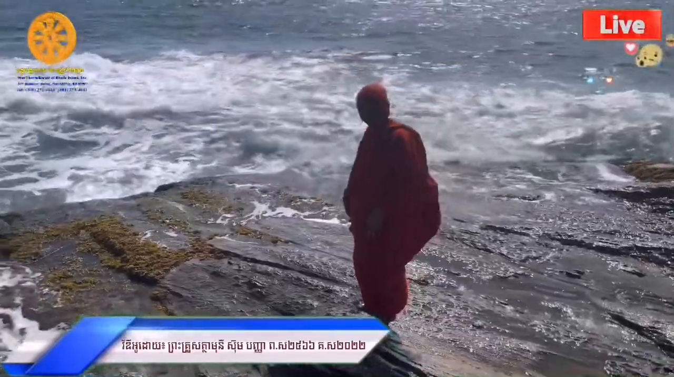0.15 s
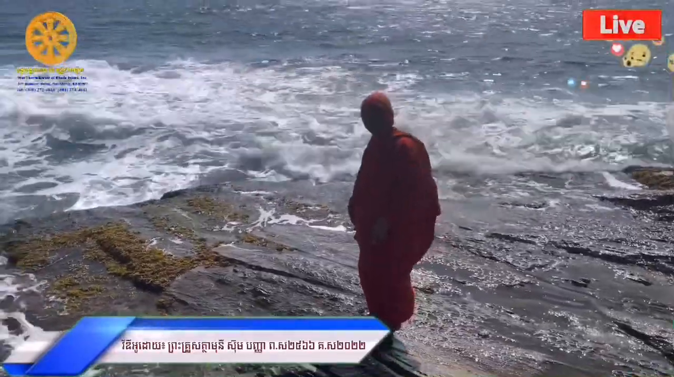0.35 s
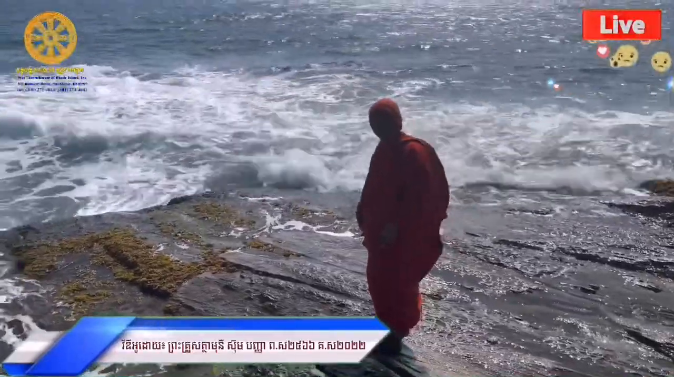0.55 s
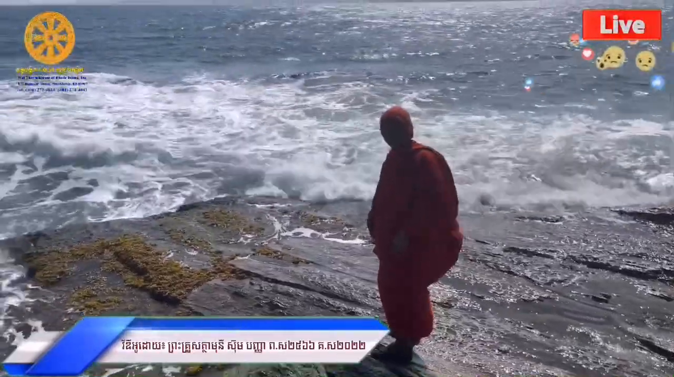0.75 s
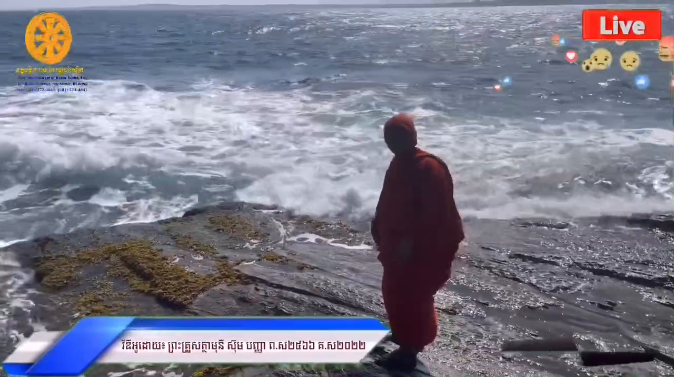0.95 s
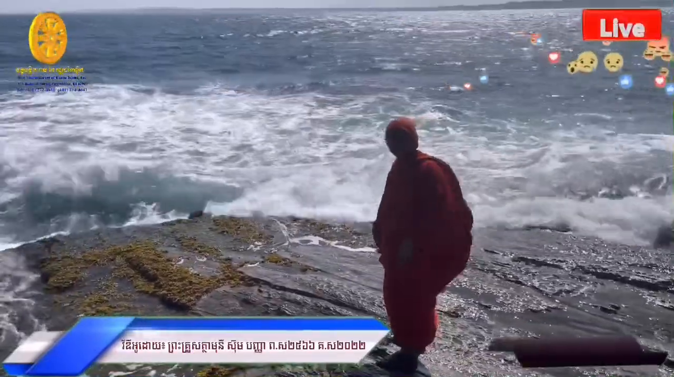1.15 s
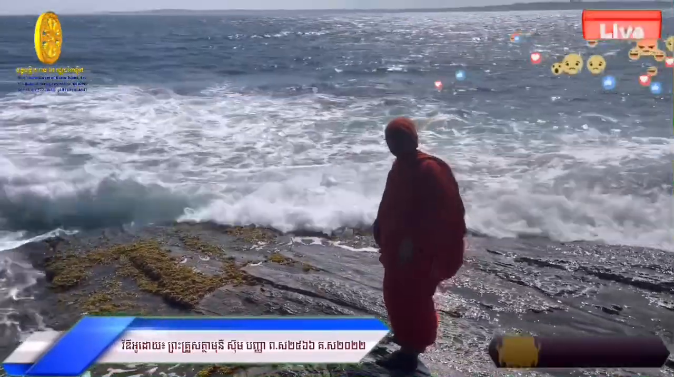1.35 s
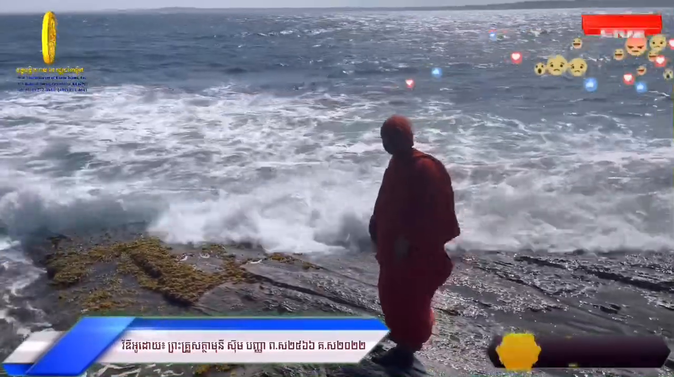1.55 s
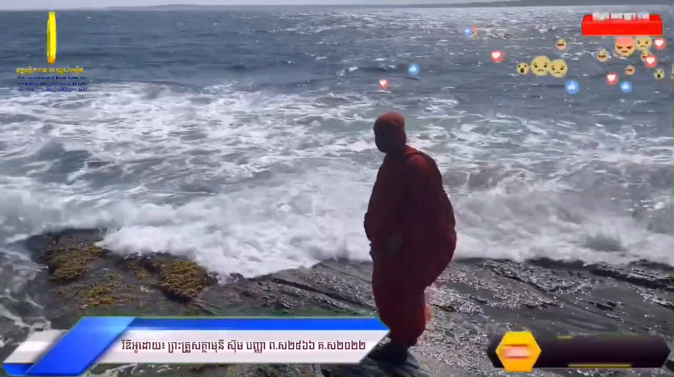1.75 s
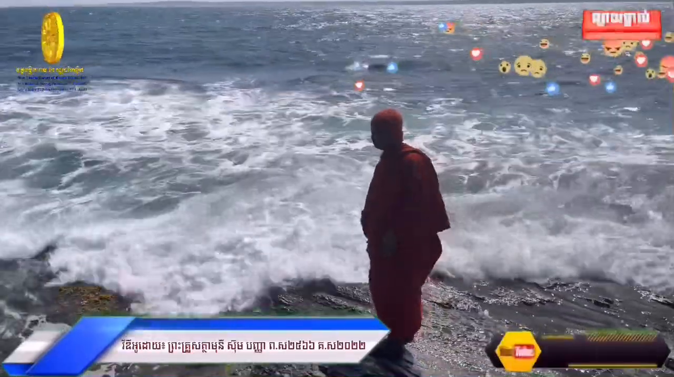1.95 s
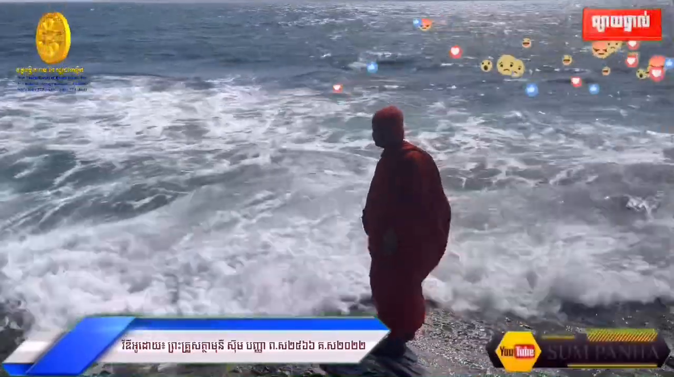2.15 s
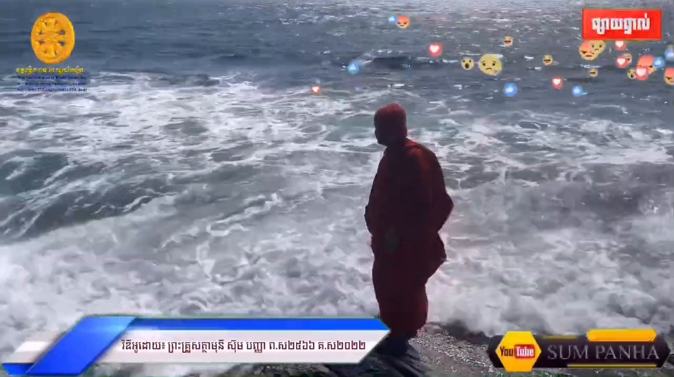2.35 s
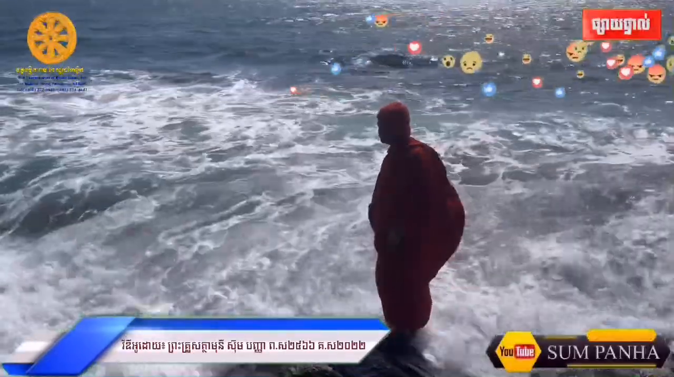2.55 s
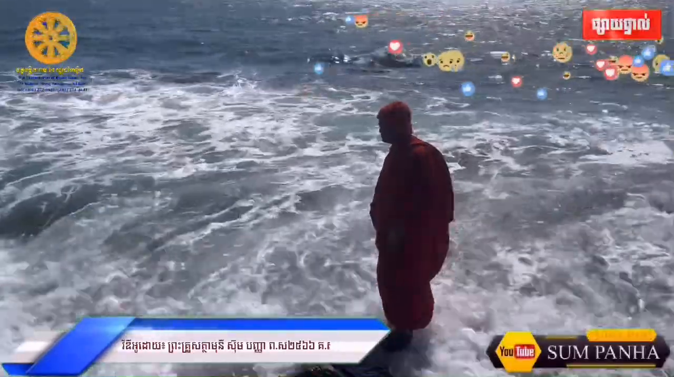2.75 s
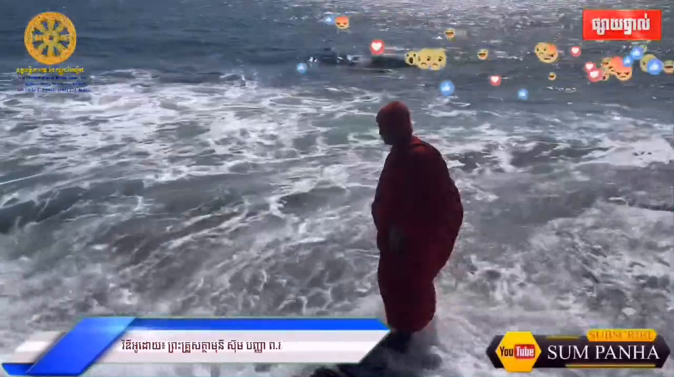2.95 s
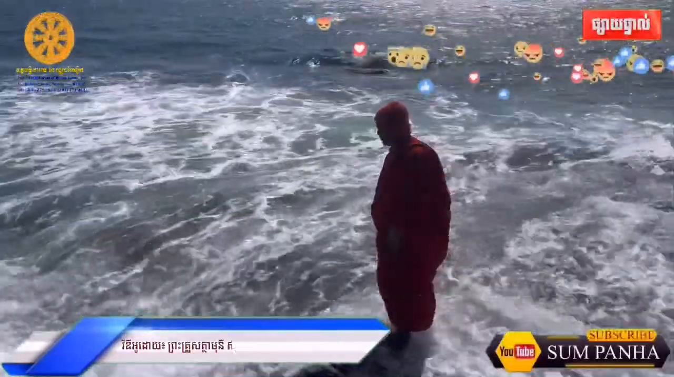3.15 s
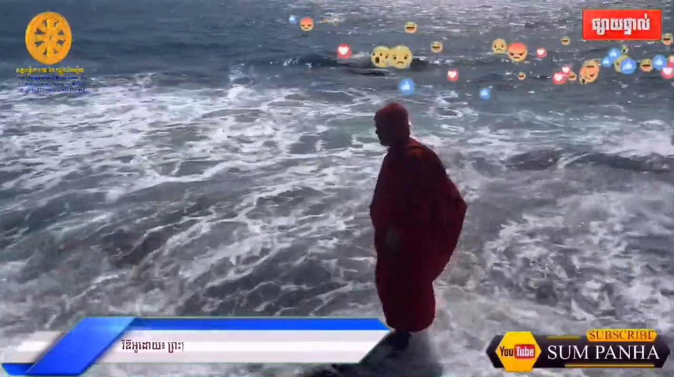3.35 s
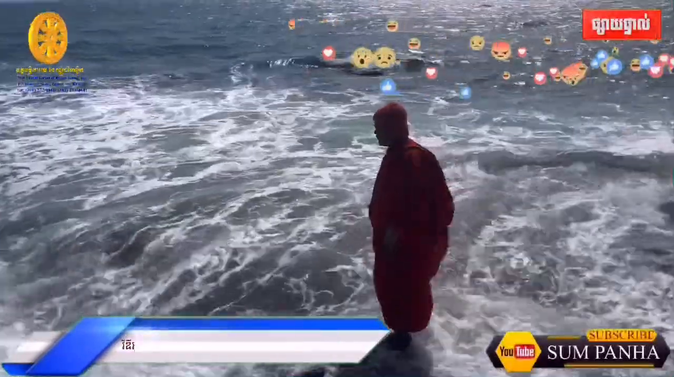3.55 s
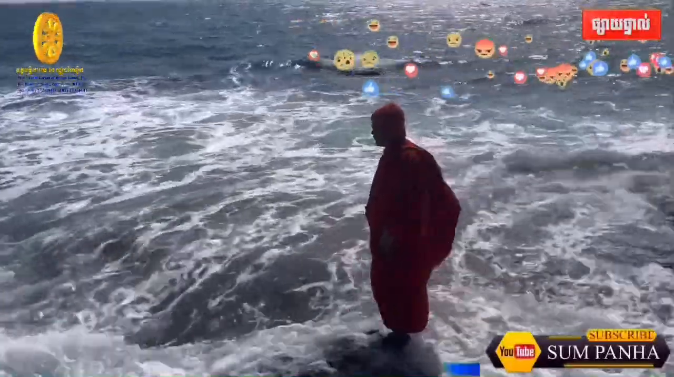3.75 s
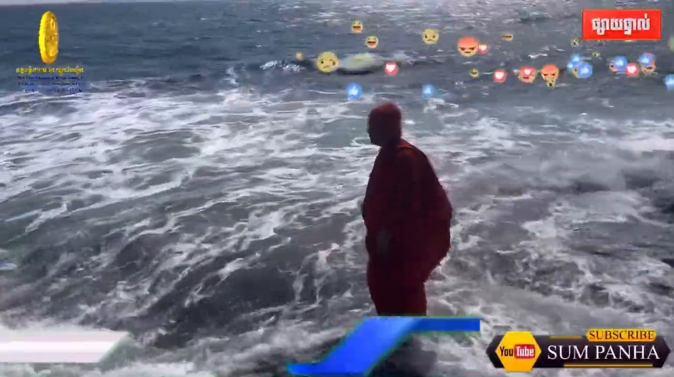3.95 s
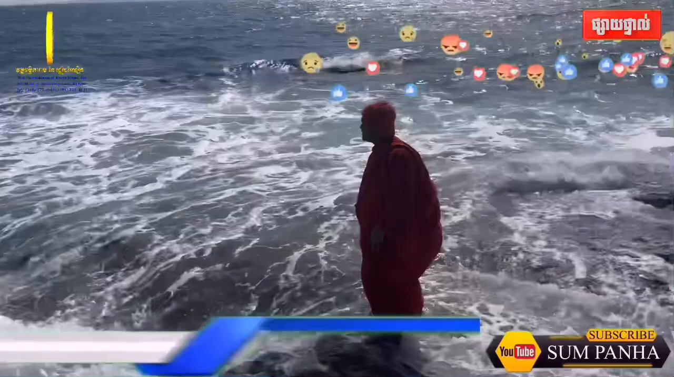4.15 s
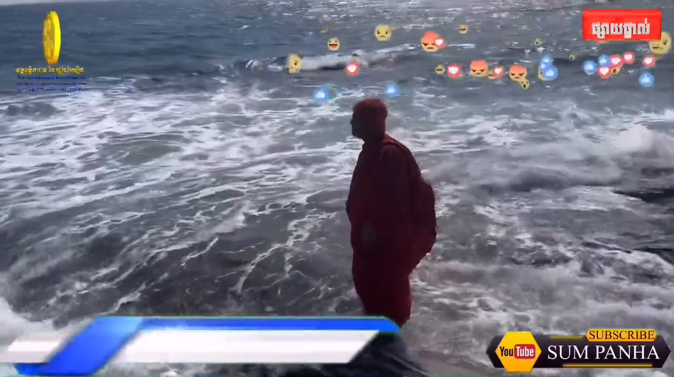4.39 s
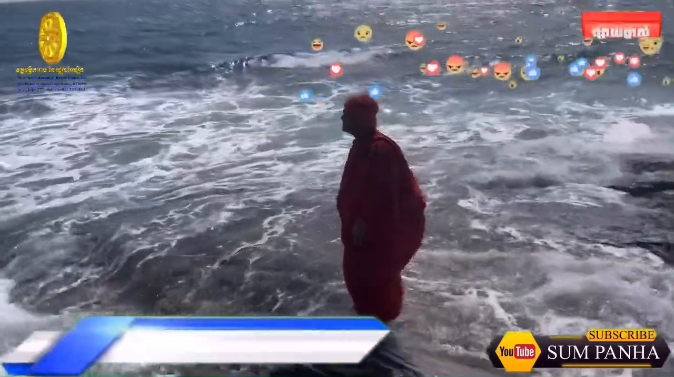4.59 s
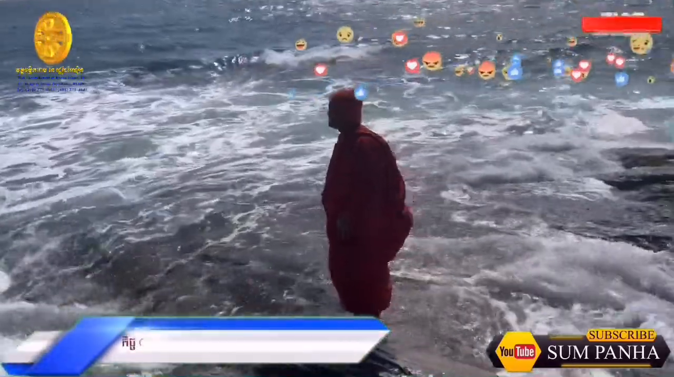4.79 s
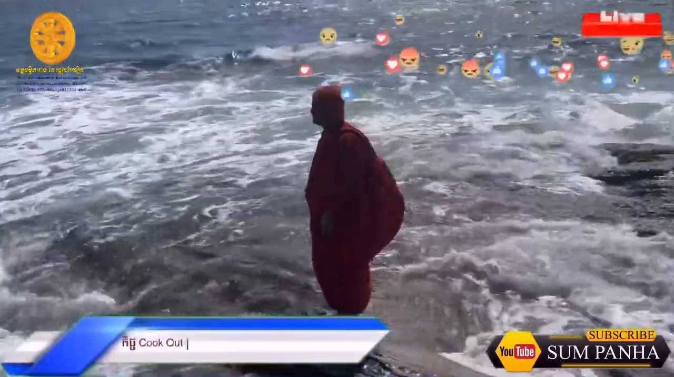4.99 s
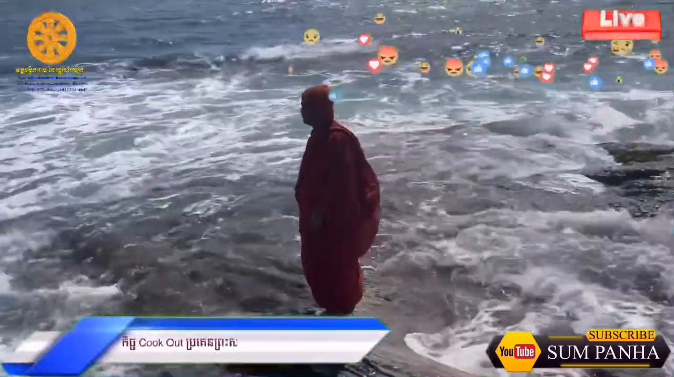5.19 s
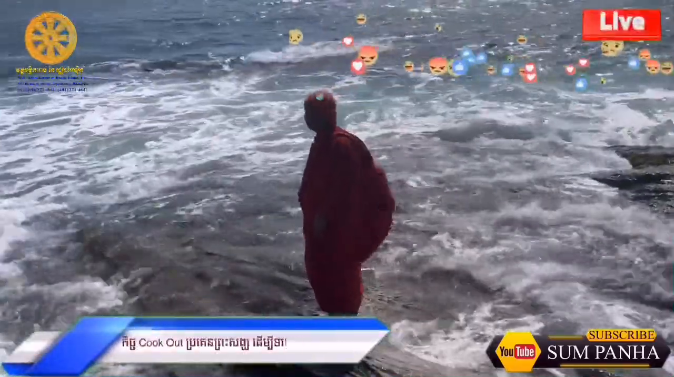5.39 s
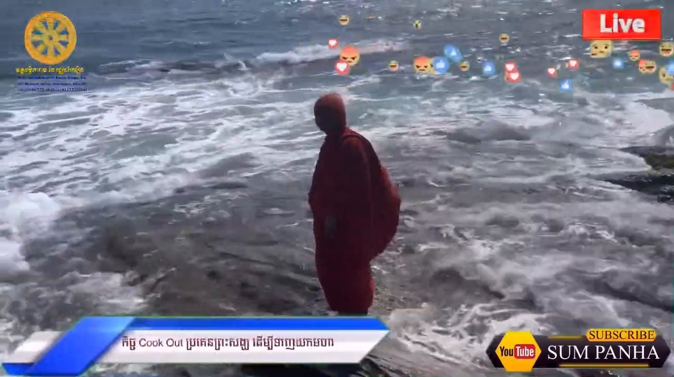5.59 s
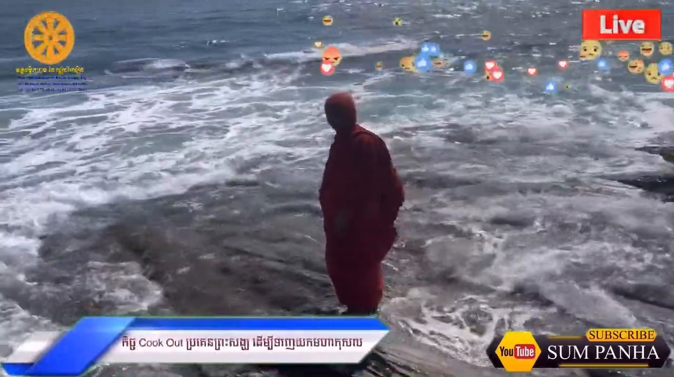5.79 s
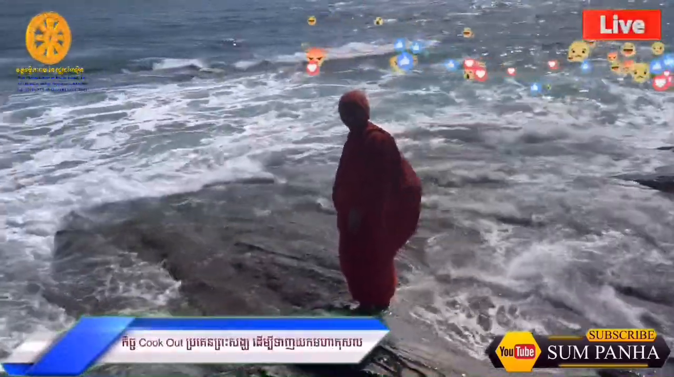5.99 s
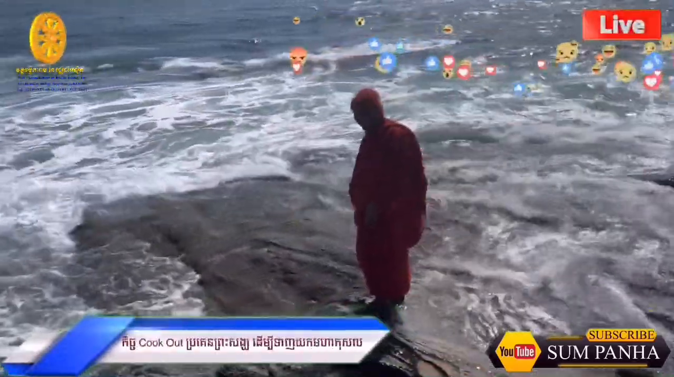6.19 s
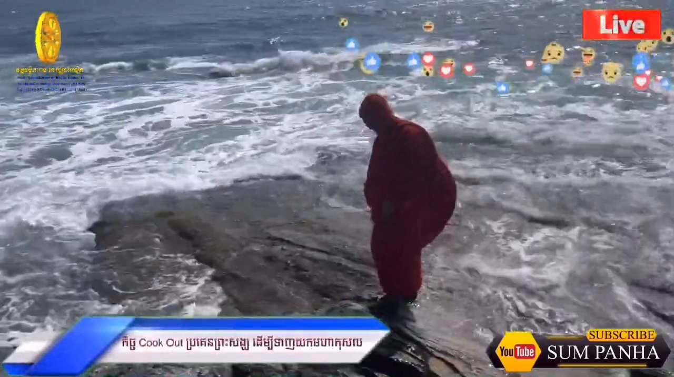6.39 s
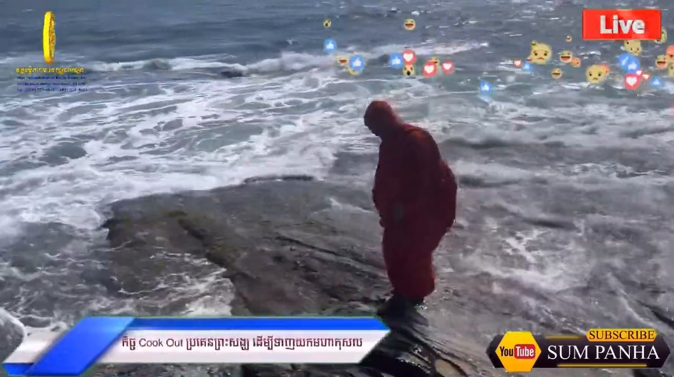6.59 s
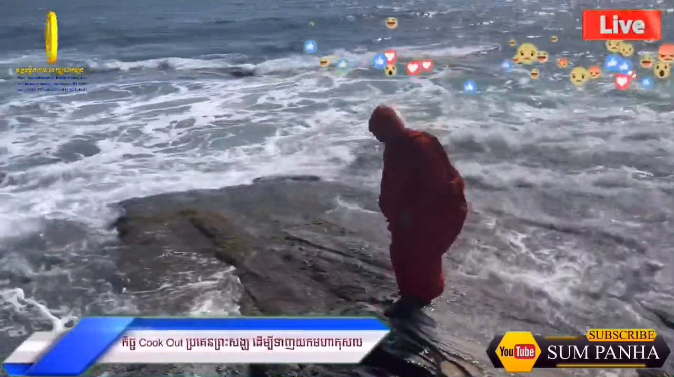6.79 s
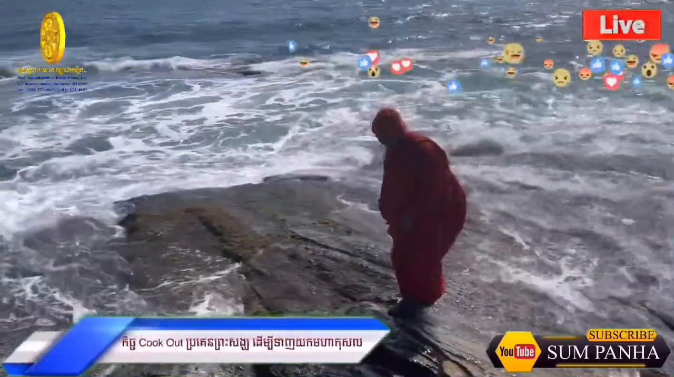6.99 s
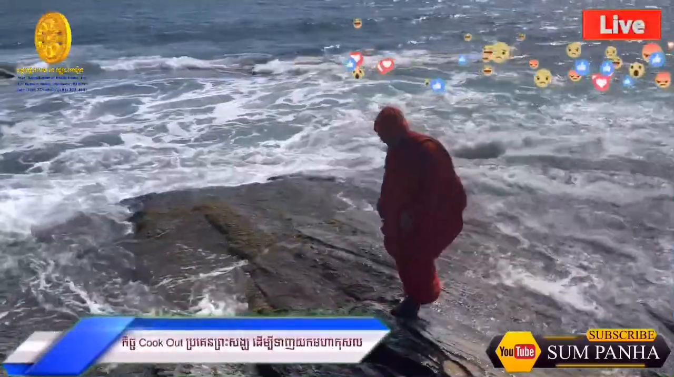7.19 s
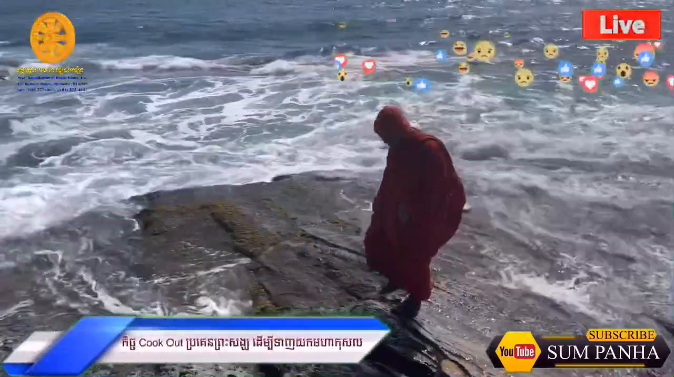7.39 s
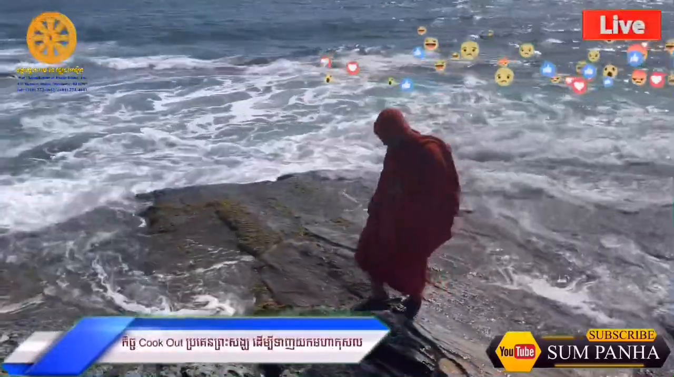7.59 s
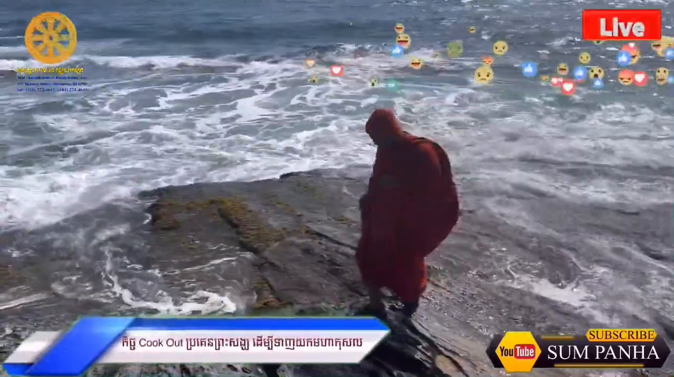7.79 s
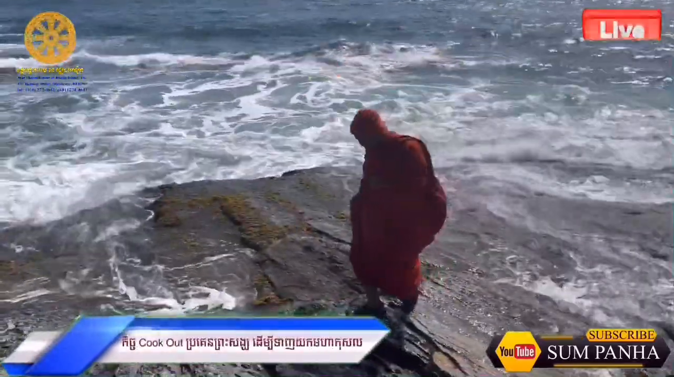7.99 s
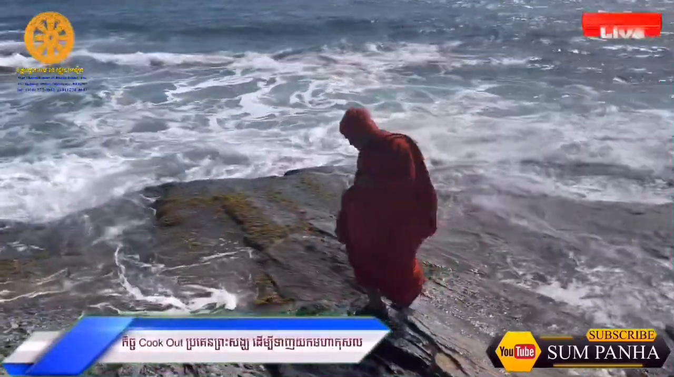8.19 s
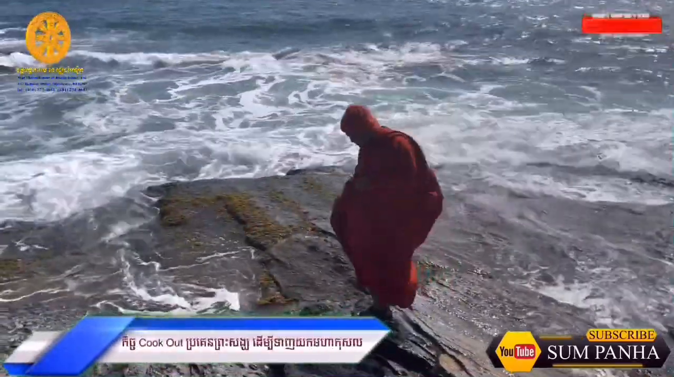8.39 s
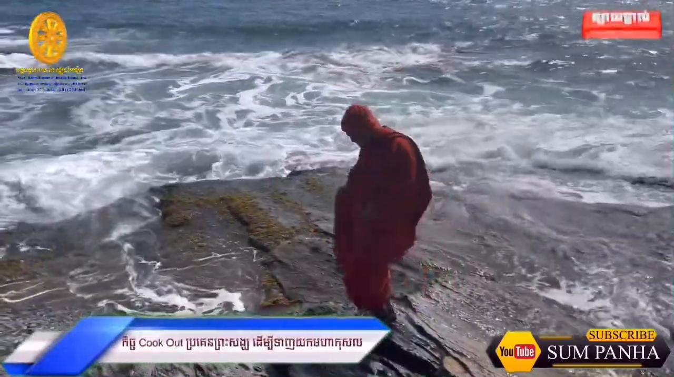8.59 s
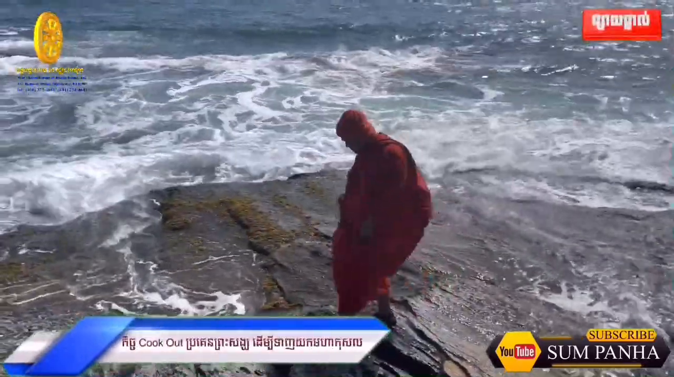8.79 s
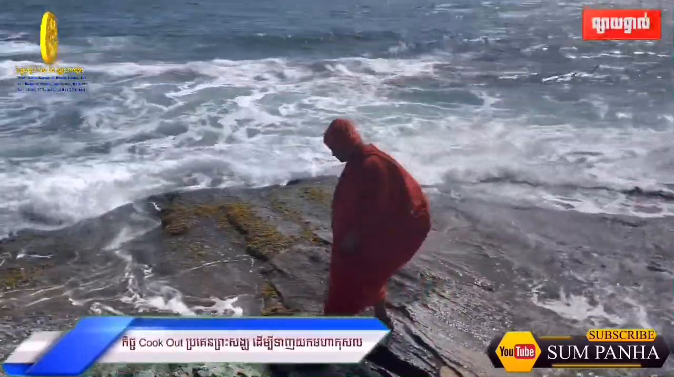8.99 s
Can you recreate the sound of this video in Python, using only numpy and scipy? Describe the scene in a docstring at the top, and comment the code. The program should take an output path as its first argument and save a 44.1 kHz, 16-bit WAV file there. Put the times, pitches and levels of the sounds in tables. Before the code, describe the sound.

Close rocky-shore surf swells, crashes softly and drains back in hissing foam and small gurgles, under heavy wind buffeting that fades late.

```python
"""A wave breaks on a rock shelf, foams over it and drains back, with more surf roaring behind.
Shaped noise bands give the dense bubble clouds: roar of big air pockets, wash of small bubbles, foam hiss.
Decaying resonances add the fizz, drips and gurgles near by; rising tones the slaps of the backwash.
Gusts rumble, flutter, knock, pop and hoot on the two closely spaced ports of a hand-held microphone."""
import sys
import numpy as np
from scipy import signal
from scipy.fft import rfft, irfft, next_fast_len
from scipy.io import wavfile

SR = 44100
rng = np.random.default_rng(int(sys.argv[2]) if len(sys.argv) > 2 else 0)


def transcribe(u):
    """Save the signal u as a 16-bit wav file named by the first command-line argument.

    u: samples, shape (n,) or (channels, n), limited to [-1, 1]; the rate is SR.
    q: integer samples, one column per channel.
    """
    v = np.clip(np.atleast_2d(u).T, -1, 1)
    q = np.round(v * 32767).astype(np.int16)
    wavfile.write(sys.argv[1], SR, q)


N = 398663
TIME = np.arange(N) / SR   # s
BINS = np.maximum(np.fft.rfftfreq(next_fast_len(N), 1 / SR), 1)   # Hz

# All event levels below are relative: scene() trims each kind of source as a whole.

# Breeze between gusts, its rumble: (time [s], level [dB])
BREEZE = [(0, -34), (.13, -40), (.7, -31.5), (2.5, -33.5), (3.3, -34), (3.9, -36), (5.0, -35), (6.1, -35),
          (6.9, -37.5), (7.3, -37.5), (7.9, -41.5), (8.3, -39), (9.04, -36.5)]
BREEZE_FLUTTER_DB, BREEZE_EDDY_HZ = -9.5, 291.2   # flutter level against the rumble; flutter pitch
# Gusts: (start [s], length [s], thump level [dB], flutter level [dB], eddy pitch [Hz])
GUSTS = [(0.25, 0.029, -27, -28, 269.5), (0.356, 0.076, -30, -27.5, 230), (0.456, 0.14, -27, -27.5, 256.8),
         (0.606, .17, -28, -30, 205.5), (0.798, .15, -34, -33.5, 220.2), (0.98, 0.13, -29.5, -28.5, 259.4),
         (1.129, 0.058, -32, -25.5, 300.7), (1.219, 0.086, -30, -26, 295.2), (1.407, 0.077, -27, -31, 224),
         (1.567, 0.073, -36, -25, 357), (1.656, 0.07, -28, -29, 259.6), (1.783, 0.069, -32, -31, 239.6),
         (1.891, 0.13, -35, -32.5, 318.4), (2.059, 0.27, -29.5, -25, 268.3),
         (2.328, 0.23, -26.5, -26, 235.2), (2.575, 0.15, -27, -24.5, 270.4), (2.772, 0.032, -30, -30, 270),
         (2.852, 0.21, -33, -28.5, 255), (3.182, 0.05, -35, -33.5, 299.5), (3.33, 0.1, -32, -31.5, 339.2),
         (3.471, 0.19, -37.5, -28.5, 359.7), (3.671, 0.06, -47, -29.5, 330), (3.76, .16, -46, -34, 339.5),
         (3.951, 0.067, -37, -30, 320.4), (4.052, 0.11, -43, -30, 391.2), (4.235, 0.065, -33, -22, 354.2),
         (4.34, .27, -30.5, -28, 305), (4.735, 0.036, -33, -29, 240), (4.8, 0.108, -32, -29.5, 225.6),
         (4.919, .22, -32, -28.5, 215), (5.169, 0.07, -27.5, -26, 235.3), (5.304, 0.13, -34.5, -31.5, 235),
         (5.627, 0.19, -31, -33, 214.5), (5.886, 0.13, -34, -30.5, 249.8), (6.069, 0.16, -32, -37, 240.2),
         (6.478, 0.21, -37, -43, 220), (6.828, .05, -42, -43, 220.6), (7.007, 0.039, -33.5, -46, 247),
         (8.426, 0.064, -35, -41, 209.2), (8.652, 0.29, -34.5, -45, 199.8)]
GUST_ATTACK_S, GUST_RELEASE_S = .014, .036
GUST_ARCH_DB = 2.0   # a gust is this much stronger in its middle than at its ends
# Spectrum of slow buffeting by large eddies: (frequency [Hz], density [dB per Hz])
BUFFETING_SPECTRUM = [(20, -30), (36, -16.5), (54, -1.5), (78, -1), (125, -3.5), (195, -9.5), (310, -22.5),
                      (700, -38), (5000, -76)]
# Spectrum of fast flutter by small eddies: (frequency [Hz], density [dB per Hz])
FLUTTER_SPECTRUM = [(20, -24), (105, -17), (180, 0.5), (270, 1.5), (370, -1), (510, -5), (730, -17),
                    (1300, -21), (2500, -25.5), (8000, -63)]
# Port favoured by the veering wind: (time [s], left minus right level [dB])
WIND_SIDE = [(0, 3.5), (1.3, 3.3), (1.7, .3), (2.4, 1), (2.75, 2.5), (3.6, 0.8), (4.1, -.6), (4.6, 0.8),
             (5.1, 2), (6.5, 0.5), (8.5, 4.5)]
# Tones shed at the microphone's edge: (start [s], length [s], level [dB], pitch [Hz])
HOOTS = [(2.772, 0.036, -28, 315), (2.86, .19, -29, 310.7), (3.337, 0.22, -30, 410), (3.6, 0.092, -34, 370),
         (4.738, 0.059, -30.5, 292), (4.9, .36, -35.5, 255.2)]
# Sharp buffets of wind: (time [s], level at the height [dB], Gaussian half-length [s], low-pass corner [Hz])
BUFFETS = [(0.508, -20, 0.005, 1100), (0.525, -22, 0.008, 1200), (0.545, -18, 0.0046, 1700),
           (0.573, -25, 0.013, 2200), (0.604, -16, 0.002, 2000), (0.617, -20.5, 0.005, 2800),
           (0.661, -26, 0.019, 1400), (1.041, -25, 0.022, 1300), (1.175, -26, 0.025, 1200),
           (1.423, -23, 0.015, 1100), (1.518, -23.5, 0.018, 1100), (2.165, -28, 0.02, 999.3),
           (2.26, -21, 0.005, 1700), (2.4, -20.5, 0.013, 1700), (2.497, -18.5, 0.012, 1501),
           (2.608, -17, 0.0072, 1700), (2.656, -19, 0.011, 1400), (2.935, -21.5, 0.016, 1798),
           (4.012, -23, 0.012, 850), (4.152, -21, 0.012, 850), (4.268, -18, 0.014, 849),
           (4.439, -24.5, 0.045, 800), (5.81, -29, 0.03, 1702), (7.626, -20.5, 0.0025, 1302),
           (8.3, -22, 0.0019, 750), (8.596, -24, 0.0021, 848), (8.683, -23, 0.0019, 903)]
# Single eddies striking the ports: (time [s], peak level [dB], pitch [Hz])
KNOCKS = [(0.21, -16, 235), (0.386, -13.5, 264), (1.0, -21, 73.4), (1.032, -20, 194.8), (1.274, -16, 306),
          (1.612, -12, 344), (1.817, -18, 121), (2.184, -19, 346), (2.293, -14, 158.2), (2.655, -15, 234),
          (2.788, -11.5, 323), (3.039, -11.5, 327), (3.613, -15, 364), (3.955, -13.5, 311),
          (4.118, -15.5, 328.6), (4.259, -16, 299), (4.481, -16, 288), (4.964, -13.5, 252),
          (5.076, -18, 109.5), (5.096, -15, 286), (5.227, -16, 244), (5.64, -17.5, 201)]

# Backwash slapping into hollows of the rock: (time [s], peak level [dB], central pitch [Hz])
SLAPS = [(5.67, -20, 598), (5.8, -14, 890), (5.822, -19, 1545), (5.9, -20.5, 1300), (5.94, -19, 1000),
         (6.057, -12, 559), (6.13, -19, 1080), (6.72, -23, 673), (6.827, -16, 873), (6.9, -17, 882),
         (7.227, -20, 641), (7.35, -13.5, 675), (7.45, -21, 900), (7.787, -17, 662), (8.808, -16, 910)]
# Spectrum of the surf: (frequency [Hz], density [dB per Hz])
SURF_SPECTRUM = [(40, 0), (100, -15), (200, -0.5), (400, -0.5), (520, 0.5), (700, 1), (1100, -1.5),
                 (1700, -5.5), (2350, -7.5), (2900, -7), (3900, -10.5), (4500, -11), (5200, -10),
                 (6100, -11.5), (7100, -14.5), (14000, -18)]
# Churning of the sea on the shelf, at every pitch: (time [s], level [dB])
SWELL = [(0, -0.5), (1.3, -1), (2.2, 0.5), (4.1, -1.2), (4.6, -0.5), (4.8, -0.9), (5.5, 0), (5.78, 1),
         (6.0, -0.7), (6.6, -0.5), (7.5, -1.5), (8.12, -3), (8.45, -1.5), (8.8, -1), (9.04, -1.5)]
# The breaking wave, which builds earlier the higher the pitch:
# (bubble pitch [Hz], level outside it [dB], lift [dB], rise [s], hold [s], fall [s])
BREAKER = [(1040, -3.5, 4, 0.3, 0.48, 0.16), (2160, -3, 2, 0.39, 0.65, 0.98), (4900, -5, 5, 0.72, 1, 0.43),
           (9202, -5, 5.5, 0.86, 0.29, 0.89)]
BREAKER_LANDS_S = 1.9
# Spray, settling foam and backwash lifting a band of bubbles:
# (start [s], length [s], edge [s], lift [dB], pitch [Hz], width [octaves])
WASHES = [(1.472, 0.092, 0.027, 2.5, 11020, 0.48), (1.77, 0.11, 0.025, 1, 5800, 1),
          (1.92, .42, 0.058, 1.2, 3100, 0.41), (2.17, 0.13, 0.043, 2.5, 10600, 0.33),
          (2.1, 1.2, 0.094, 1.0, 5558, 0.57), (2.948, 0.39, .06, 1.5, 9500, 0.65),
          (3.024, .12, 0.037, 4, 2774, 0.33), (3.3, 0.61, .1, 2.5, 6076, 0.19),
          (3.154, 0.92, .1, 0.5, 1100, 0.99), (3.7, 1.41, 0.19, 1.9, 5200, 0.8),
          (4.4, 0.89, 0.099, 0.5, 2002, .6), (5.7, .22, 0.049, 1.3, 1800, .65),
          (5.87, 1.69, 0.18, 2.5, 1011, 0.7), (6.3, 2.5, .1, 2.2, 2000, 0.2), (7.2, 0.37, .06, 0, 1100, .9)]

# Echo off the rock underfoot as water covers and bares it: (time [s], delay [ms], strength [0-1])
ROCK_ECHO = [(0, 1.34, 0.12), (1.1, 1.4, 0), (1.6, 0.97, 0.08), (2.1, 0.93, 0), (3.6, 0.77, 0.03),
             (4.2, 1.14, 0), (5.1, 1.395, 0), (5.9, 1.488, 0.05), (6.8, 1.44, 0.1), (8.0, 1.44, 0.11),
             (8.5, 1.2, .17)]
ROCK_ECHO_TOP_HZ = 3480   # the rough rock scatters what is higher
# Correlation of the sea at the two ports: (frequency [Hz], left-right likeness [-1 to 1])
LIKENESS = [(50, -0.81), (350, 0.29), (800, -0.33), (1400, -0.27), (2100, 0.2), (3100, -0.24), (4150, 0.35),
            (5300, -0.45), (6300, 0.52), (7100, -0.17), (8300, 0.63), (8700, 0.78), (9400, 0.51),
            (11000, 0.92)]
# Bands where both ports carry one and the same hiss: (frequency [Hz], width [Hz])
LOCKED_BANDS = [(10150, 550), (12000, 500), (12800, 600)]
# Balance of the ports for the sea: (frequency [Hz], left minus right level [dB])
PORT_BALANCE = [(100, -3.5), (650, 1), (1800, -1), (3000, 1.5), (4200, 2.5), (5500, 3.5), (6400, 2),
                (7000, 1), (7800, -1), (9000, 0.5)]
# Treble response of the microphone: (frequency [Hz], level [dB])
MICROPHONE = [(7500, 0), (8550, -2), (9100, 3.5), (10000, 6), (10750, 12), (11500, 4.5), (12200, 0),
              (12900, -24.5)]
# Treble phase of the microphone: (frequency [Hz], lag of the right port [half turns])
PHASE_LAG = [(8700, 0), (9300, .5), (9750, .95), (10330, 1.02), (10750, 1.2), (11150, 1.52), (11780, 2)]
CUTOFF_HZ = 13100


def from_db(db):
    """Amplitude ratio: a level of 20 dB is a factor of ten."""
    return 10 ** (np.asarray(db) / 20)


def rms_one(x):
    """Normalization: scale to unit root-mean-square amplitude."""
    return x / np.sqrt(np.mean(x ** 2) + 1e-20)


def in_time(rows):
    """Linear interpolation: one curve in time per column of a table."""
    s, *columns = np.transpose(rows)
    return [np.interp(TIME, s, c) for c in columns]


def at_hz(points, hz):
    """Logarithmic pitch: read a spectrum on a log-frequency axis."""
    frequencies, levels = np.transpose(points)
    return np.interp(np.log(hz), np.log(frequencies), levels)


def filtered(x, response):
    """Convolution theorem: apply a frequency response given on BINS."""
    size = next_fast_len(N)
    return irfft(rfft(x, size) * response, size)[..., :N]


def drift(rate):
    """Low-pass noise: smooth random wandering of spread 1, with its corner at the rate [Hz]."""
    step = 40   # samples between computed points
    r = np.exp(-2 * np.pi * rate * step / SR)
    noise = rng.standard_normal(N // step + 2002)
    slow = signal.lfilter([1], [1, -2 * r, r * r], noise)[2000:]   # drop the settling
    return np.interp(np.arange(N) / step, np.arange(len(slow)), rms_one(slow))


def envelope(start, length, attack, release):
    """Growth and decay: exponential rise to 1 at the start, hold for the length, Gaussian fall."""
    early, late = np.maximum(start - TIME, 0), np.maximum(TIME - start - length, 0)
    return np.exp(-early / attack - (late / release) ** 2)


def off_rock(sea):
    """Comb interference: direct sound plus a delayed reflection, a hollow colour that slowly shifts."""
    delay_ms, strength = in_time(ROCK_ECHO)
    dull = filtered(sea, 1 / (1 + (BINS / ROCK_ECHO_TOP_HZ) ** 6))
    echo = np.array([np.interp(TIME - delay_ms / 1000, TIME, side) for side in dull])
    return sea + strength * echo


def ports(sea):
    """Spatial coherence: spaced ports hear a wide source alike in some bands, opposed in others."""
    free = np.prod([1 - np.exp(-((BINS - hz) / width) ** 4) for hz, width in LOCKED_BANDS], axis=0)
    alike = 1 - free * (1 - np.clip(at_hz(LIKENESS, BINS), -1, 1))
    mid = filtered(sea[0] + sea[1], np.sqrt(1 + alike) / 2)
    side = filtered(sea[0] - sea[1], np.sqrt(1 - alike) / 2)
    balance = from_db(at_hz(PORT_BALANCE, BINS) * np.array([[.5], [-.5]]))
    return filtered(np.array([mid + side, mid - side]), balance)


def airflow():
    """Addition of powers: gusts join the breeze and pull its eddies to their pitch.

    Returns thump gain, flutter gain and eddy pitch [Hz] in time."""
    thump = from_db(in_time(BREEZE)[0]) ** 2
    flutter = thump * from_db(BREEZE_FLUTTER_DB) ** 2
    pitch = flutter * BREEZE_EDDY_HZ   # weighted by flutter power
    for start, length, thump_db, flutter_db, hz in GUSTS:
        progress = np.clip((TIME - start) / length, 0, 1)
        arch = from_db(GUST_ARCH_DB * (np.sin(np.pi * progress) - 2 / np.pi))   # mean of 0 dB
        power = (arch * envelope(start, length, GUST_ATTACK_S, GUST_RELEASE_S)) ** 2
        flutter_power = power * from_db(flutter_db) ** 2
        thump = thump + power * from_db(thump_db) ** 2
        flutter = flutter + flutter_power
        pitch = pitch + flutter_power * hz
    return np.sqrt(thump), np.sqrt(flutter), pitch / flutter


def eddies(spectrum, lumpy_db, lump_rate, alike, wander):
    """Turbulent pressure: lumpy noise, now in step at both ports and now opposed as the wind veers."""
    mid, side = [rng.standard_normal(N) * from_db(lumpy_db * drift(lump_rate)) for part in range(2)]
    likeness = np.tanh(alike + wander * drift(21.4))
    mid, side = mid * np.sqrt(1 + likeness), side * np.sqrt(1 - likeness)
    return rms_one(filtered(np.array([mid + side, mid - side]), from_db(at_hz(spectrum, BINS))))


def wind(buffeting_db, flutter_db, usual_hz, glide):
    """Eddy size sets pitch: large eddies thump and small ones flutter above them."""
    thump, flutter, eddy_hz = airflow()
    slow = eddies(BUFFETING_SPECTRUM, lumpy_db=0.0, lump_rate=34, alike=-0.11, wander=0.45)
    fast = eddies(FLUTTER_SPECTRUM, lumpy_db=2.0, lump_rate=42, alike=0.37, wander=0.42)
    # the same turbulence sweeps past more or less quickly, which moves its whole colour
    speed = (eddy_hz / usual_hz) ** glide
    place = np.cumsum(speed) % (N - 1)
    fast = np.array([np.interp(place, np.arange(N), port) for port in fast])
    return from_db(buffeting_db) * thump * slow + from_db(flutter_db) * flutter * fast


def hoots(level_db, width_hz, waver_db):
    """Periodic vortex shedding: a steady gust makes a narrow, hollow, wavering note."""
    out = np.zeros((2, N))
    for start, length, db, hz in HOOTS:
        resonance = 1 / (1 + (2 * (BINS - hz) / width_hz) ** 2)
        note = filtered(rng.standard_normal((3, N)), resonance)
        note = rms_one(note[0] + .5 * note[1:])   # mostly the same at both ports
        out += note * from_db(db + level_db) * envelope(start, length, GUST_ATTACK_S, GUST_RELEASE_S)
    return out * rms_one(from_db(waver_db * drift(25)))


def buffets(level_db, corner_hz, ragged_db):
    """Turbulent burst: a single hard eddy tears past as a short rough pop of band-limited noise."""
    out, age = np.zeros((2, N)), np.arange(-SR // 8, SR // 8) / SR
    body = signal.butter(1, [120, corner_hz], "band", fs=SR, output="sos")
    for s, db, length, reach_hz in BUFFETS:
        top = signal.butter(4, reach_hz, fs=SR, output="sos")
        noise = rng.standard_normal((2, len(age)))
        air = rms_one(signal.sosfilt(np.vstack([body, top]), noise))
        start = int((s + age[0]) * SR)
        swell = from_db(db + level_db) * np.exp(-.5 * (age / length) ** 2)
        out[:, start:start + len(age)] += air * swell
    return out * rms_one(from_db(ragged_db * drift(136)))


def knocks(level_db, rise_cycles, fall_cycles, sag):
    """Vortex impact: a few pressure swings at the ports that sink in pitch as the eddy breaks up."""
    out, age = np.zeros(N), np.arange(-SR // 20, SR // 20) / SR
    for (s, db, hz), phase in zip(KNOCKS, rng.random(len(KNOCKS))):
        cycles, start = age * hz, int((s + age[0]) * SR)
        edge = np.where(age < 0, rise_cycles, fall_cycles)
        swell = from_db(db + level_db) * np.exp(-(cycles / edge) ** 2)
        swing = np.sin(2 * np.pi * (cycles * (1 - sag * cycles) + phase))
        out[start:start + len(age)] += swell * swing
    return out


def slaps(level_db, ring_s, spread_s, rise, count=6):
    """Air-pocket resonance: each slap traps a few pockets, which ring briefly and rise in pitch."""
    out, age = np.zeros((2, N)), np.arange(SR // 10) / SR
    for s, db, hz in SLAPS:
        for delay, size, pan in rng.random((count, 3)):
            start = int((s + delay ** 2 * spread_s) * SR)
            pitch = hz * 2 ** ((size - .5) / 2)   # within a quarter octave
            pocket = np.sin(2 * np.pi * pitch * age * (1 + rise * age)) * np.exp(-age / ring_s)
            pocket = pocket[:max(N - start, 0)] * from_db(db + level_db)
            out[:, start:start + len(pocket)] += np.sqrt([[pan], [1 - pan]]) * pocket
    return out


def sea_levels():
    """Superposed level curves: swell plus breaking wave (dB) at each pitch of the breaker."""
    swell, = in_time(SWELL)
    return np.array([swell + calm + lift * envelope(BREAKER_LANDS_S, hold, rise, fall)
                     for hz, calm, lift, rise, hold, fall in BREAKER])


def water():
    """Bubble size sets pitch: return the level in time (dB) at any pitch from swell, breaker and washes."""
    lifts = [db * envelope(start, length, edge, edge) for start, length, edge, db, hz, octaves in WASHES]
    levels = np.vstack([sea_levels(), lifts])
    pitches = np.log([row[0] for row in BREAKER])

    def level(hz):
        """Interpolation in pitch: blend the neighbours and add the washes that reach this one."""
        shares = [np.interp(np.log(hz), pitches, row) for row in np.eye(len(pitches))]
        reach = [np.exp(-(np.log2(hz / row[4]) / row[5]) ** 2) for row in WASHES]
        return np.array(shares + reach) @ levels
    return level


def bubbles(water_level, level_db, per_s, cycles, size_db, clump_db, low_hz, high_hz, count=28):
    """Damped resonance: near bubbles and drops ring down 60 dB in the given cycles and come in clumps."""
    out = np.zeros((2, N))
    chance = per_s / count / SR * from_db(clump_db * drift(7))   # per sample at 2500 Hz
    for hz in np.geomspace(low_hz, high_hz, count):
        born = np.flatnonzero(rng.random(N) < chance * np.sqrt(hz / 2500))
        draws = rng.random((N // 100, 3))[:len(born)]
        born = born[:len(draws)]
        sizes = from_db(size_db * np.minimum(-np.log(draws[:, 0]), 4))
        port = (draws[:, 1] < .5).astype(int)
        clicks = np.zeros((2, N))
        clicks[port, born] = sizes * np.sign(draws[:, 2] - .5)
        clicks += 1e-18 * (np.arange(N) % 2)   # an inaudible trace
        r, w = np.exp(-np.log(1000) * hz / (cycles * SR)), 2 * np.pi * hz / SR
        rings = signal.lfilter([1, -1], [1, -2 * r * np.cos(w), r * r], clicks)
        gain = from_db(water_level(hz) + at_hz(SURF_SPECTRUM, hz)) * np.sqrt(hz / SR)
        out += rms_one(rings) * gain
    return from_db(level_db) * out


def surf(water_level, level_db, surge_db, patchy_db, churn_rate):
    """Incoherent sum of dense bubble clouds: each size swells partly with the rest, partly alone."""
    out, surge = 0, drift(6)
    edges = np.geomspace(40, 15000, 22)   # Hz
    white = rng.standard_normal((2, 2, N))   # neighbouring bands use different noise
    for k, (low, high) in enumerate(zip(edges, edges[1:])):
        band_filter = signal.butter(2, [low, high], "band", fs=SR, output="sos")
        band = signal.sosfilt(band_filter, white[k % 2])
        hz = np.sqrt(low * high)
        lumpiness = min(1, (1000 / hz) ** 0.23)   # small bubbles are many and even out
        alone = lumpiness * patchy_db * drift(churn_rate)
        out = out + band * from_db(water_level(hz) + surge_db * surge + alone)
    return from_db(level_db) * filtered(out, from_db(at_hz(SURF_SPECTRUM, BINS)))


def scene():
    """Superposition: wind on the microphone, and the sea with fizz, drips and gurgles on the rock."""
    air = wind(buffeting_db=2.5, flutter_db=0.5, usual_hz=266.3, glide=.8)
    air = air + knocks(level_db=-3.5, rise_cycles=1.0, fall_cycles=1.7, sag=.04)
    air = air + buffets(level_db=-3.5, corner_hz=900, ragged_db=4.2)
    air = air + hoots(level_db=-1.0, width_hz=86, waver_db=1.5)
    facing = from_db(in_time(WIND_SIDE)[0] * np.array([[.5], [-.5]]))

    hollows = slaps(level_db=-10.0, ring_s=0.006, spread_s=0.0122, rise=10.3)
    water_level = water()
    fizz = bubbles(water_level, level_db=-31.0, per_s=2500, cycles=11.6, size_db=0.0, clump_db=1.5,
                   low_hz=601.5, high_hz=11026)
    drips = bubbles(water_level, level_db=-32.5, per_s=400, cycles=100, size_db=1.5, clump_db=3.0,
                    low_hz=2200, high_hz=11250, count=22)
    gurgles = bubbles(water_level, level_db=-29.5, per_s=200, cycles=78, size_db=1.75, clump_db=1.09,
                      low_hz=561.8, high_hz=2890, count=22)
    sea = surf(water_level, level_db=-14.5, surge_db=0.28, patchy_db=1.38, churn_rate=17.0)
    return ports(off_rock(sea + fizz + drips + gurgles + hollows)) + facing * air


def record(dry):
    """Port resonance: the treble peaks, the right port slips a full turn behind, and the top is cut."""
    lag = np.pi * np.interp(BINS, *np.transpose(PHASE_LAG))
    response = from_db(at_hz(MICROPHONE, BINS)) * np.exp(-1j * lag * np.array([[0], [1]]))
    low_pass = signal.ellip(10, .1, 90, CUTOFF_HZ, fs=SR, output="sos")
    return signal.sosfilt(low_pass, filtered(dry, response))


dry = scene()
out = record(dry)
transcribe(out)
```